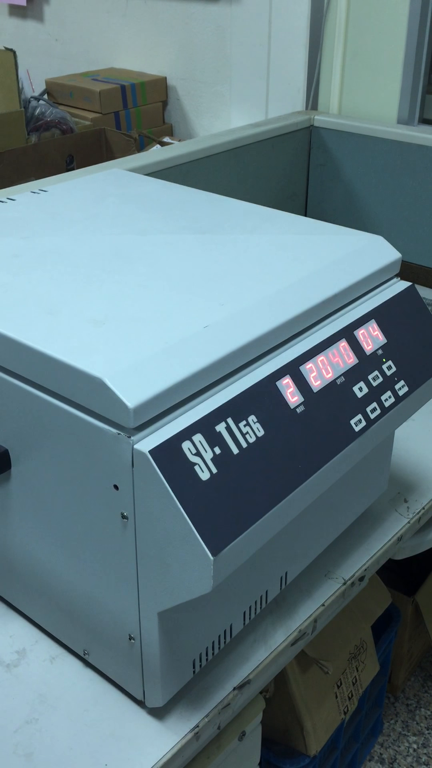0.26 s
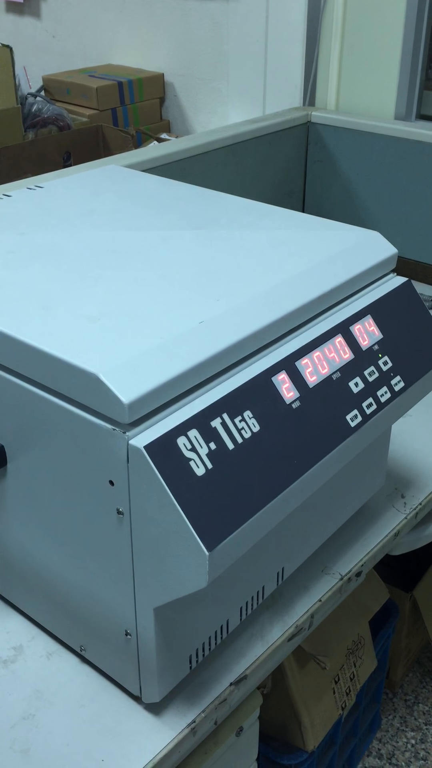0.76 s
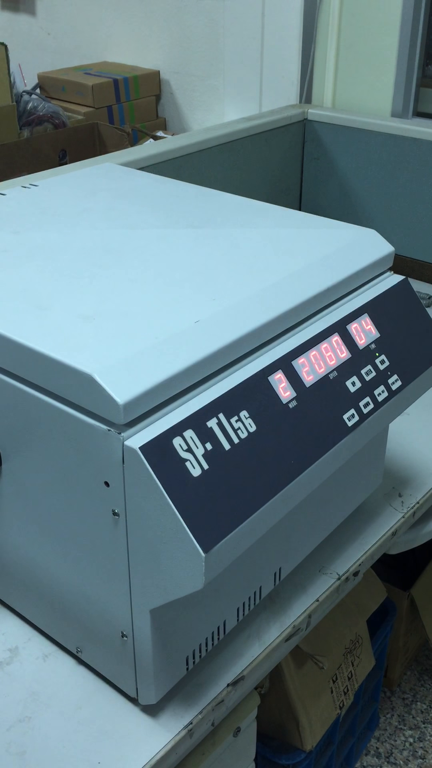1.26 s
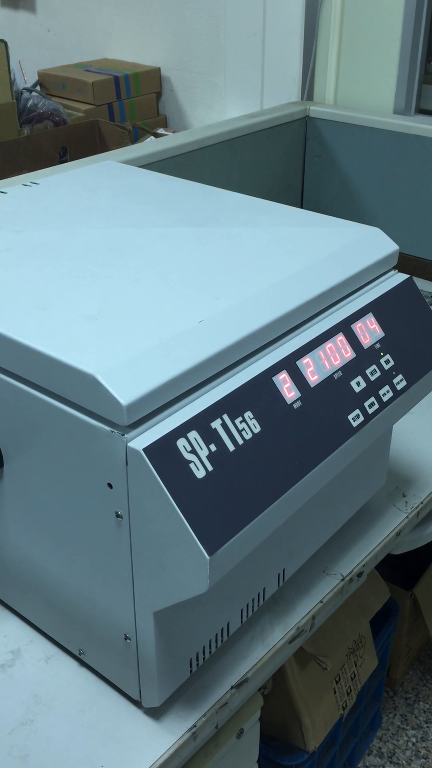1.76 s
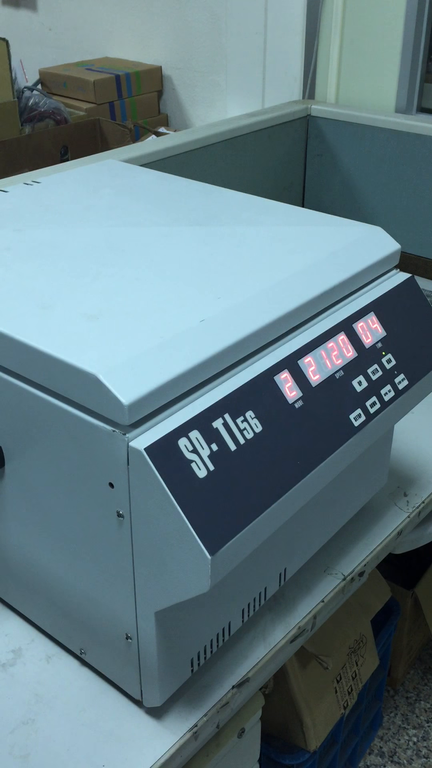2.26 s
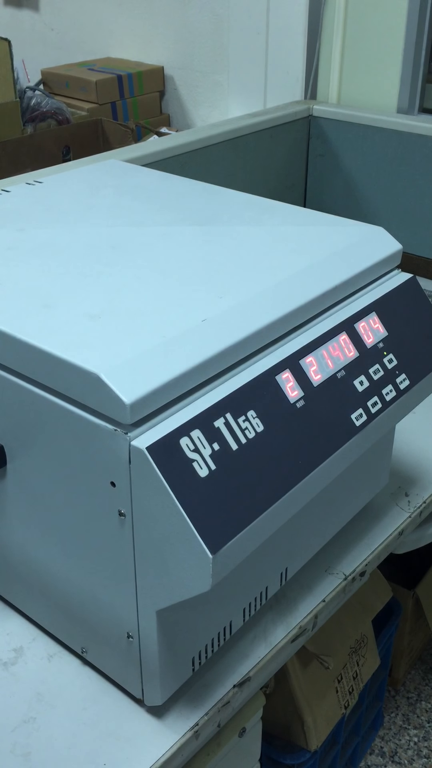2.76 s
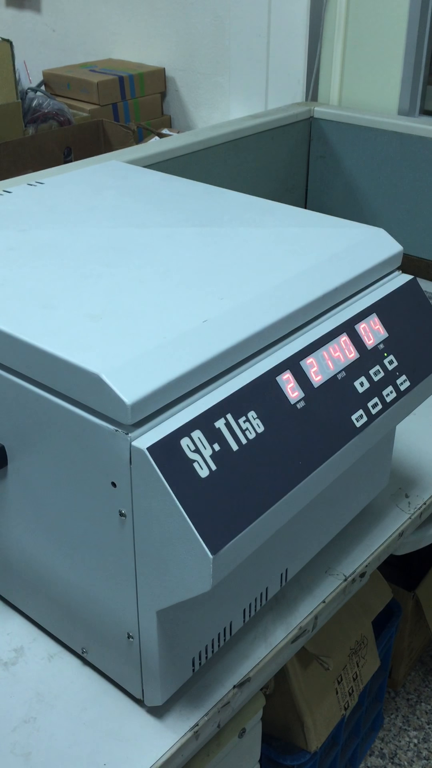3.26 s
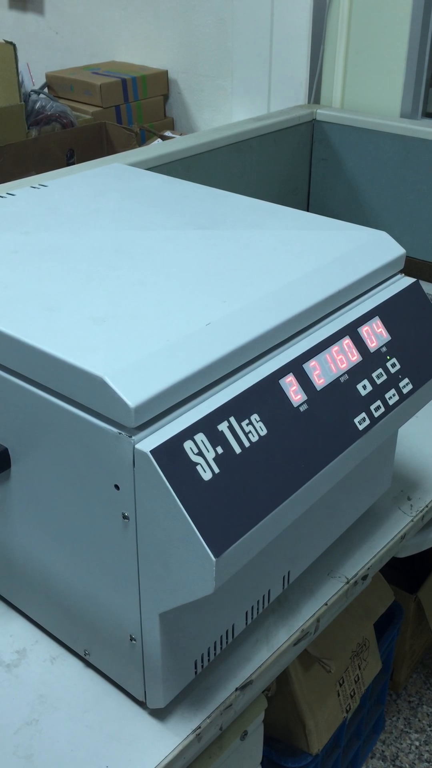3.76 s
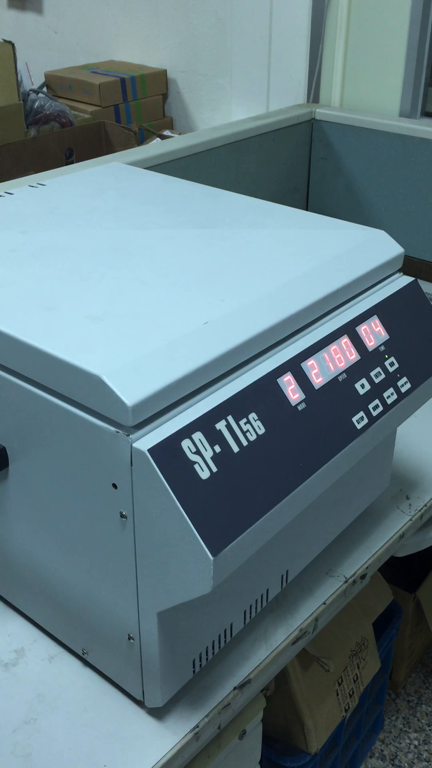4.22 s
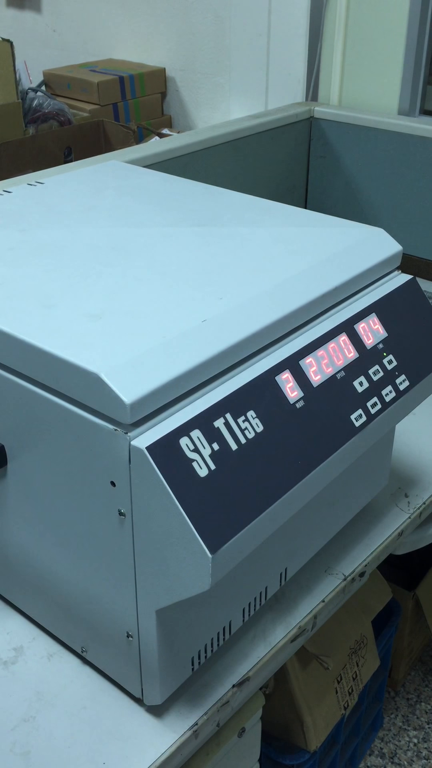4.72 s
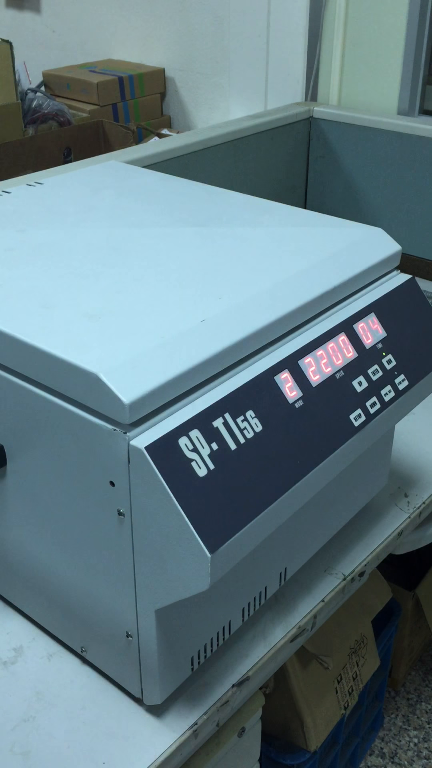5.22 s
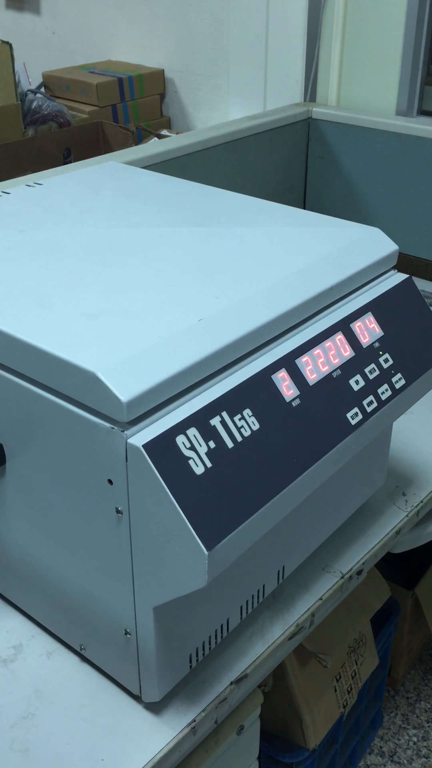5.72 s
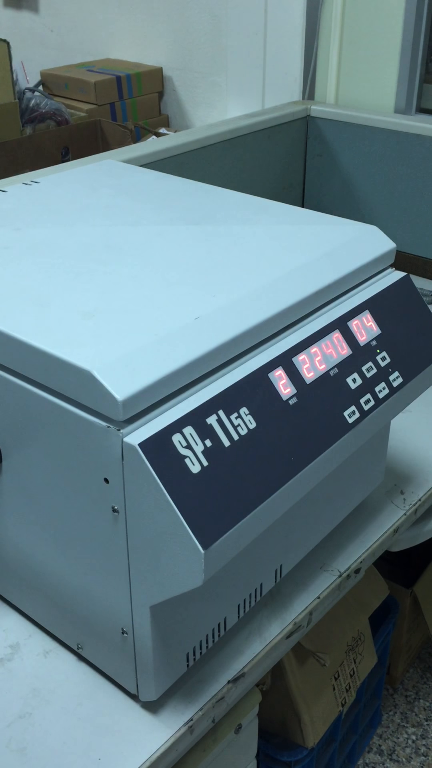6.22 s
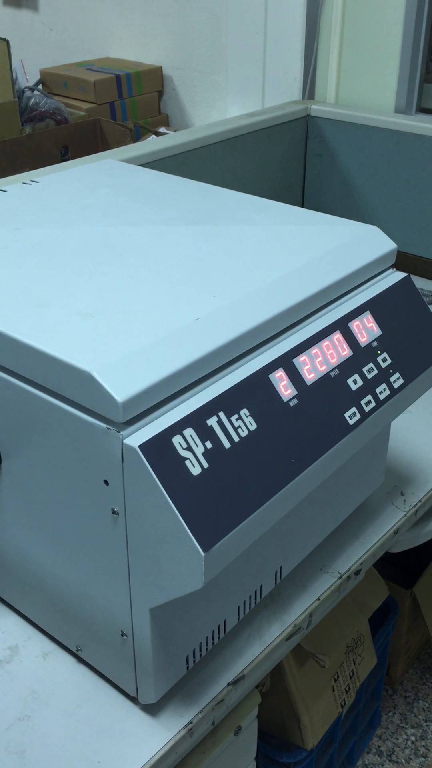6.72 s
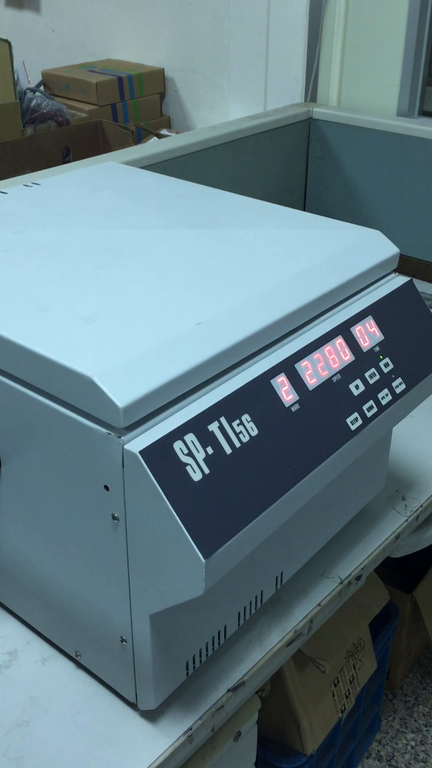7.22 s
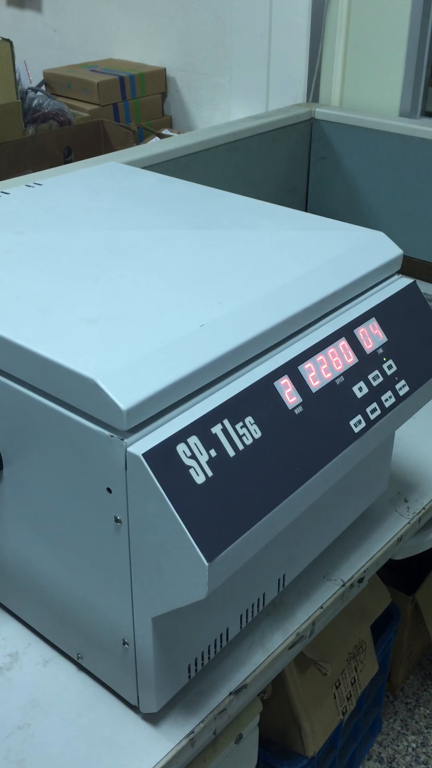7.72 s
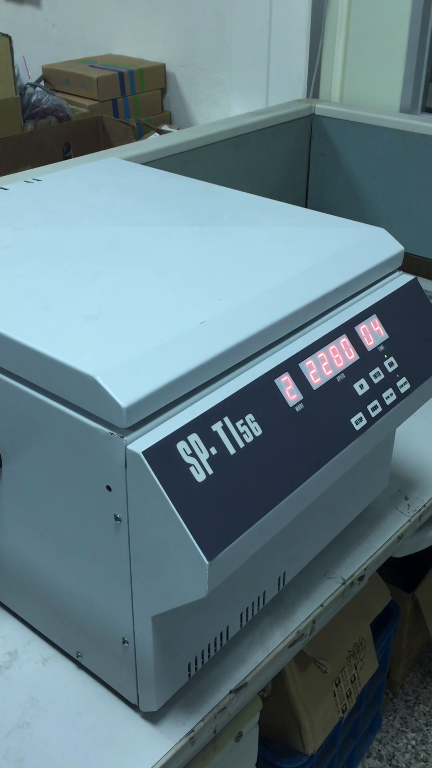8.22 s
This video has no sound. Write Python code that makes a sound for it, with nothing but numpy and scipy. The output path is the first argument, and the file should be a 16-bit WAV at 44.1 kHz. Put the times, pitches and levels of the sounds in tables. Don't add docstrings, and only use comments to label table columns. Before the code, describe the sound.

From 0 s a benchtop centrifuge is already spinning, heard close up in a small room. The strongest sound is a clean, round low hum near 137 Hz, gliding evenly upward to about 154 Hz by the end at roughly 8.4 s, with a much quieter octave and very faint wavering higher partials. Its loudness shifts slightly as it passes through room resonances, getting a little fuller late on. Low turbulence rumbles through the steel casing, and broad, midrange-heavy air noise hisses from the vents; both grow gradually by a couple of decibels, the hiss also becoming brighter, with only tiny flutter. At about 2.4 s a loose lid part gives two soft ticks just milliseconds apart, almost one click, with a short noisy tail. Weak, fixed mains hum near 120 Hz lies beneath throughout. The top treble is dull and slightly thinned. The sound ends still accelerating.

```python
import sys
import numpy as np
from scipy import signal
from scipy.fft import rfft, irfft, next_fast_len
from scipy.io import wavfile
from scipy.ndimage import uniform_filter1d

SR = 44100
rng = np.random.default_rng(int(sys.argv[2]) if len(sys.argv) > 2 else 0)


def ratio(d):
    e = np.asarray(d, float) / 20
    return 10 ** e


def waveform_to_disk(signal):
    frames = np.transpose(np.atleast_2d(signal))
    scaled = np.clip(frames, -1, 1) * 32767
    samples = np.round(scaled).astype(np.int16)
    wavfile.write(sys.argv[1], SR, samples)


N = 373968

START_HZ = 137.35

# (centre [Hz], width [Hz], lift [dB])
CASING_MODES = [(46, 6, 7), (59, 6.4, 3), (73, 8.9, 1), (105, 6.4, 1.5), (123, 9.1, 5), (134, 29, 6.5),
                (153.7, 5.3, 7.5), (191, 20, 3.5), (210.6, 7.8, 8.5), (227, 13.7, -5.5), (247.2, 8, 7),
                (301.6, 14, 4), (327, 6.9, 5), (406, 8, 0), (421.3, 8.6, 9), (457.6, 7.3, 6.5),
                (491, 6.1, 5), (453, 8, -3), (520, 17, 4), (664, 10, 2.5), (552, 29, -4), (80.5, 6.8, -2),
                (677, 15, 2), (611, 15, 4), (716, 15, 5.5), (1001, 23, 3.5), (1270, 66, 1)]


def evened(x):
    return x / np.sqrt(np.mean(x ** 2) + 1e-20)


def read(points, hz):
    f, value = np.transpose(points)
    return np.interp(np.log(hz + 1), np.log(f + 1), value)


def lifts(modes, hz):
    return sum(db / (1 + (2 * (hz - centre) / width) ** 2) for centre, width, db in modes)


def drift(top_hz):
    t = np.arange(0, N + 64, 64) / SR
    rates = np.geomspace(.2, top_hz, 24)
    slow = sum(np.sin(2 * np.pi * (f * t + rng.random())) / np.sqrt(f) for f in rates)
    return np.interp(np.arange(N) / SR, t, evened(slow))


def noise(shape_db):
    size = next_fast_len(N)
    hz = np.fft.rfftfreq(size, 1 / SR)
    white = rfft(rng.standard_normal(size))
    return irfft(white * ratio(shape_db(hz)) * np.sqrt(SR / 2), size)[:N]


def bucket_hz():
    t = np.arange(N) / SR
    rise_hz_per_s, easing_hz_per_s2 = 2.075, .0087
    return START_HZ + rise_hz_per_s * t - easing_hz_per_s2 * t ** 2


def speedup():
    return 100 * (bucket_hz() / START_HZ - 1)


def rotor():
    # (multiple of the bucket pitch, level [dB rms])
    partials = [(.25, -84), (3, -66), (4, -65), (8.845, -61.5)]
    # (centre [Hz], width [Hz], lift [dB])
    standing_waves = [(138.9, 1.7, 1.1), (140.5, 2, .4), (143.7, 4.6, -2.4), (148.1, 2.5, .7),
                      (151.9, 9.5, 3.8), (275, 5.4, -10.5), (291.1, 1.6, -10), (293.9, 3.6, -7.5),
                      (301.6, 1.8, -10), (304.6, 3.6, -5)]
    hz = bucket_hz()
    turn = 2 * np.pi * np.cumsum(hz) / SR
    tone_db = -27.3 + lifts(standing_waves, hz)
    octave_db = -42 + lifts(standing_waves, 2 * hz)
    out = ratio(tone_db) * np.cos(turn)
    out = out + ratio(octave_db) * np.cos(2 * turn + .2 * drift(.8))
    for multiple, db in partials:
        level = ratio(db + 1.0 * drift(3.1))
        out = out + level * np.cos(multiple * turn + 0.87 * drift(1.49))
    return np.sqrt(2) * out


def rush(split_hz=5500):
    # (frequency [Hz], density [dB per Hz])
    air_shape = [(260, -18), (450, -2.5), (720, -4), (1200, -3.5), (2330, -4), (3300, -6), (4250, -6),
                 (5300, -10.5), (6600, -17.5), (8800, -21.5), (10000, -24), (11500, -28.5), (13500, -31.5),
                 (15200, -39)]
    # (centre [Hz], width [Hz], lift [dB])
    vent_modes = [(2325, 150, 2.5), (2890, 270, -3.5), (3104, 300, 5), (3620, 330, -3), (4870, 720, -5),
                  (10380, 550, -8), (13850, 130, -3), (2024, 83, 3), (1721, 20, 7), (3800, 100, 1.5)]
    level_db = -40 + 0.1416 * speedup()
    treble_db = .2 * speedup()
    ripple = evened(uniform_filter1d(rng.standard_normal(2000), size=2))

    def air_db(hz):
        resonant = read(air_shape, hz) + lifts(CASING_MODES + vent_modes, hz)
        no_bass = -40 * (hz < 300)
        return resonant + no_bass + .8 * np.interp(hz, np.arange(2000) * 9, ripple)

    air = noise(air_db)
    body = signal.sosfilt(signal.butter(4, [600, 4000], "band", fs=SR, output="sos"), air)
    low = signal.filtfilt(*signal.butter(2, split_hz, fs=SR), air)
    brighten = ratio(treble_db - treble_db.mean() + 0.37 * drift(33.0))
    gusts = ratio(level_db + 0.043 * drift(30.0))
    return gusts * (low + brighten * (air - low)) / body.std()


def eddies(x, patchy_db=0.77):
    hz, t, z = signal.stft(x, SR, nperseg=512)
    patches = rng.standard_normal(z.shape[::-1])
    patches = uniform_filter1d(uniform_filter1d(patches, size=18, axis=0), size=6, axis=1)
    return signal.istft(z * ratio(patchy_db * evened(patches).T), SR, nperseg=512)[1][:N]


def rumble():
    # (frequency [Hz], density [dB per Hz])
    turbulence = [(15, -88), (33, -89), (46, -80.5), (95, -73), (115, -66.5), (200, -65), (350, -68),
                  (550, -82.5), (900, -104.5)]
    level_db = -.5 + 0.14 * speedup() + .5 * drift(9.1)
    return ratio(level_db) * noise(lambda hz: read(turbulence, hz) + lifts(CASING_MODES, hz))


def ticks():
    # (time [s], peak level [dB], pitch [Hz])
    taps = [
        (2.3979, -27, 1800),
        (2.4044, -27, 1800),
    ]
    out, t = np.zeros(N), np.arange(3000) / SR
    for s, db, hz in taps:
        ring = np.sin(2 * np.pi * hz * t)
        ring = ring + 0.83 * np.sin(2 * np.pi * 1.73 * hz * t)
        ring = ring + .7 * np.sin(2 * np.pi * 0.71 * hz * t)
        around_pitch = signal.butter(2, [.6 * hz, 1.45 * hz], "band", fs=SR, output="sos")
        tail = signal.sosfilt(around_pitch, rng.standard_normal(len(t)))
        tap = ratio(-7 - 60 * t / .009) * ring * np.minimum(t / .0008, 1)
        smear = ratio(-9 - 60 * t / 0.1) * evened(tail)
        out[round(s * SR):][:len(t)] += ratio(db) * (tap + smear)
    return out


def mains():
    # (frequency [Hz], level [dB rms])
    hum_lines = [(59.5, -62.5), (119.5, -44.5)]
    t = np.arange(N) / SR
    out = np.zeros(N)
    for hz, db in hum_lines:
        out += np.sqrt(2) * ratio(db + 1.5 * drift(3.6)) * np.sin(2 * np.pi * hz * t)
    return out


def scene():
    return (rotor() + eddies(rush()) + rumble() + ticks() + mains())[None]


def gate(x, under_db=-2.5, depth_db=-8.0, from_hz=9000):
    hz, t, z = signal.stft(x, SR, nperseg=1024)
    power = uniform_filter1d(uniform_filter1d(abs(z) ** 2, size=4, axis=1), size=2, axis=2)
    usual = uniform_filter1d(uniform_filter1d(power, size=40, axis=1), size=60, axis=2)
    weak = power < usual * ratio(2 * under_db)
    reach = np.clip((hz[:, None] - from_hz) / 3000 + .5, 0, 1)
    return signal.istft(z * ratio(depth_db * reach * weak), SR, nperseg=1024)[1][:, :N]


def low_pass(x):
    return signal.sosfilt(signal.butter(12, 15190, fs=SR, output="sos"), x)


def record(dry):
    mix = gate(dry)
    return low_pass(mix)


dry = scene()
out = record(dry)
waveform_to_disk(out)
```